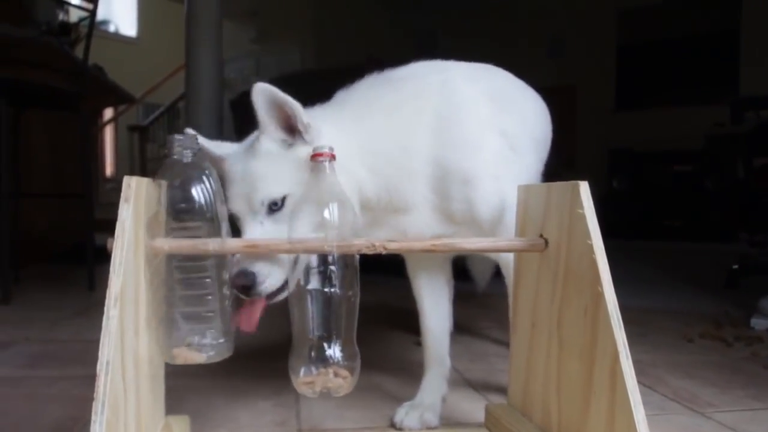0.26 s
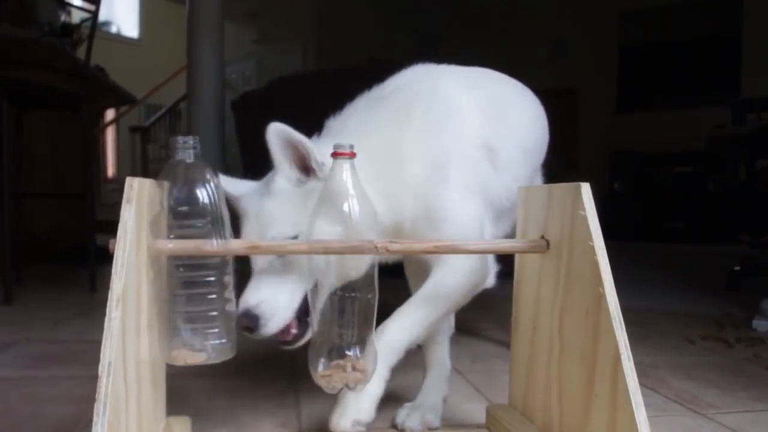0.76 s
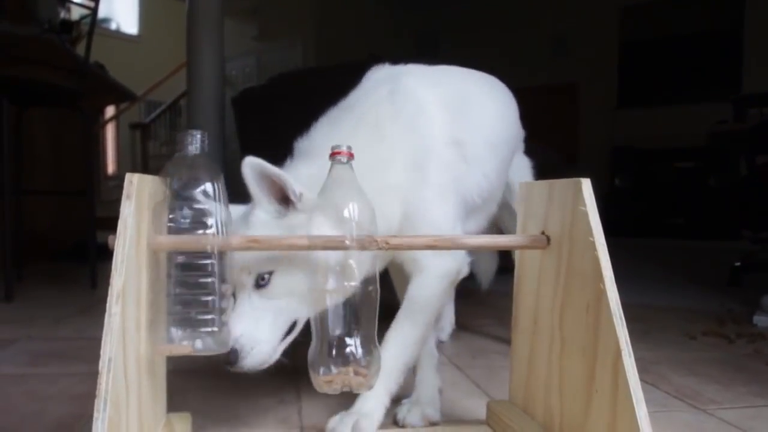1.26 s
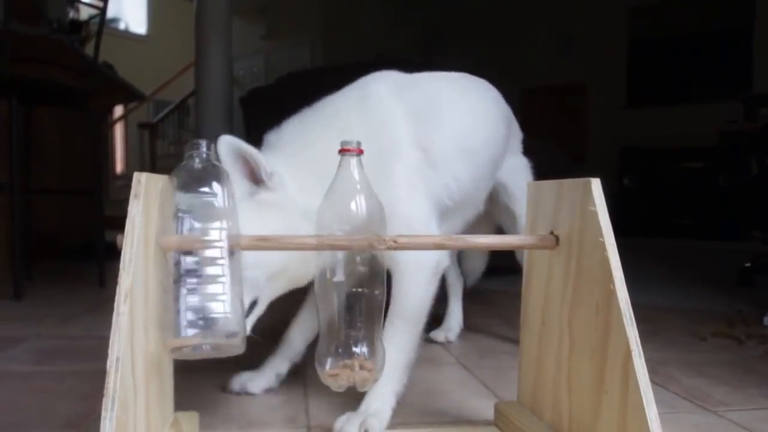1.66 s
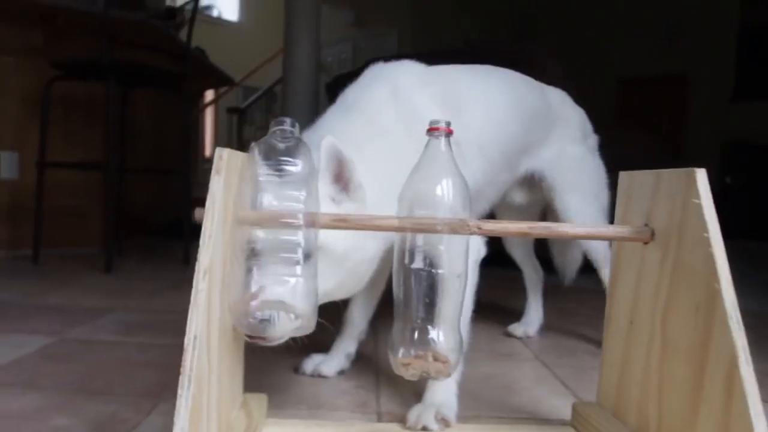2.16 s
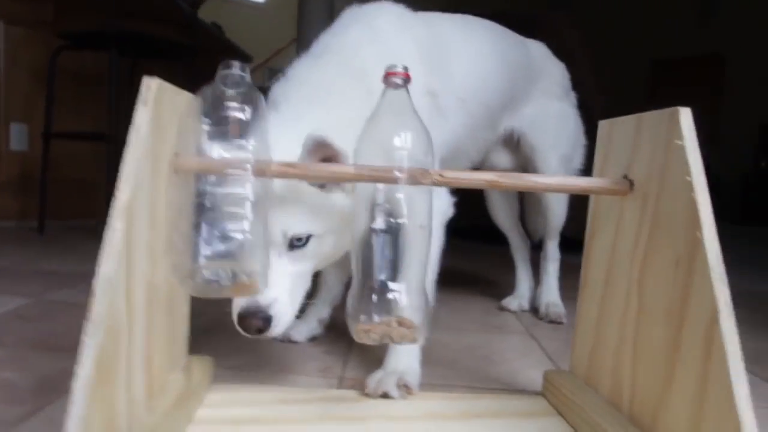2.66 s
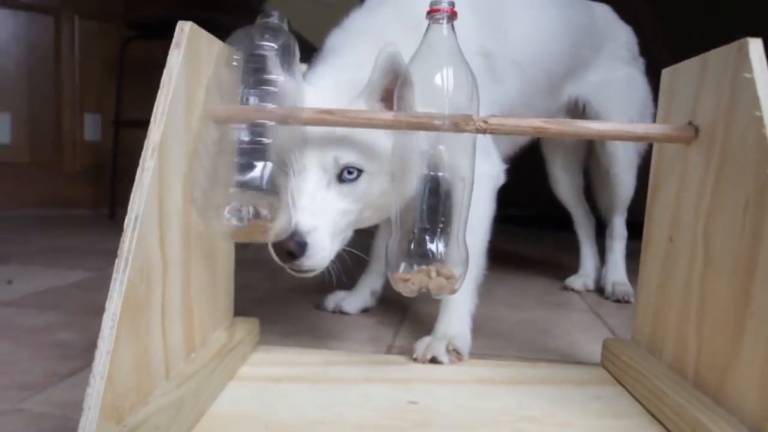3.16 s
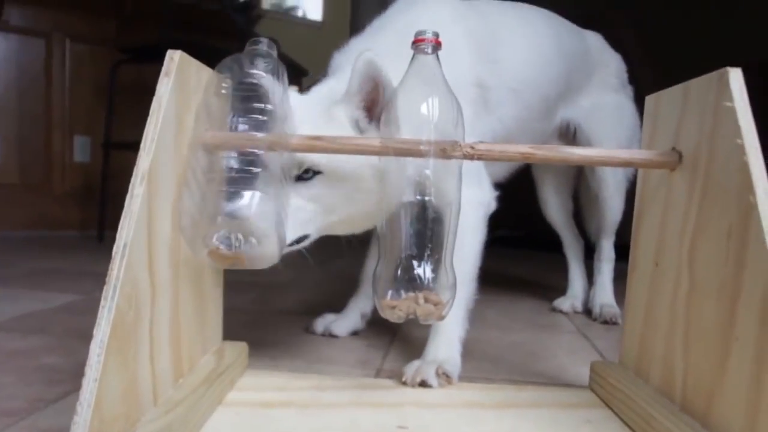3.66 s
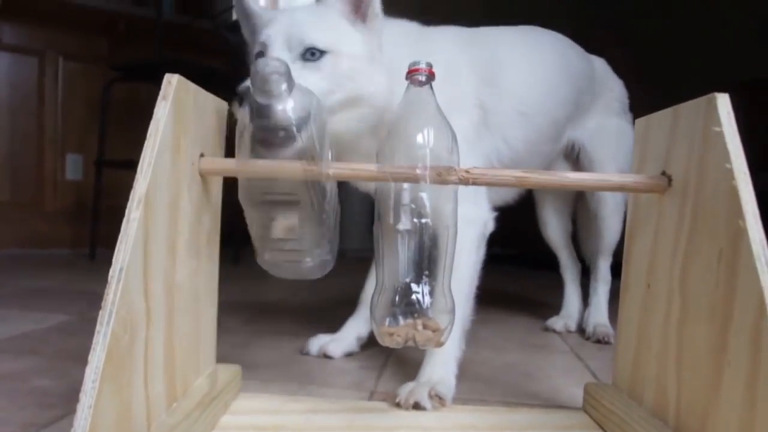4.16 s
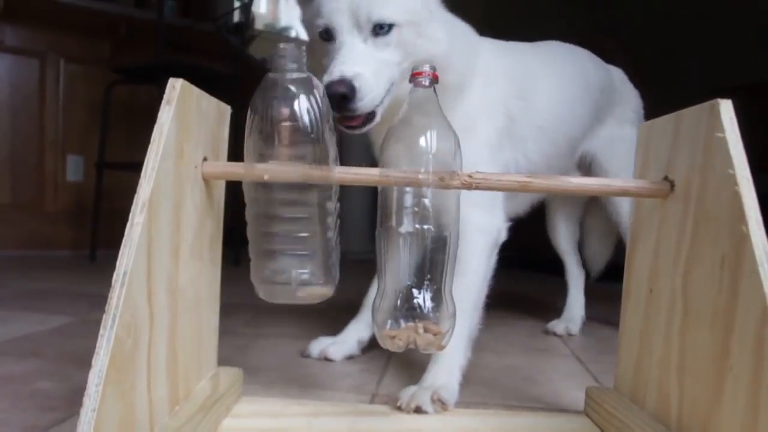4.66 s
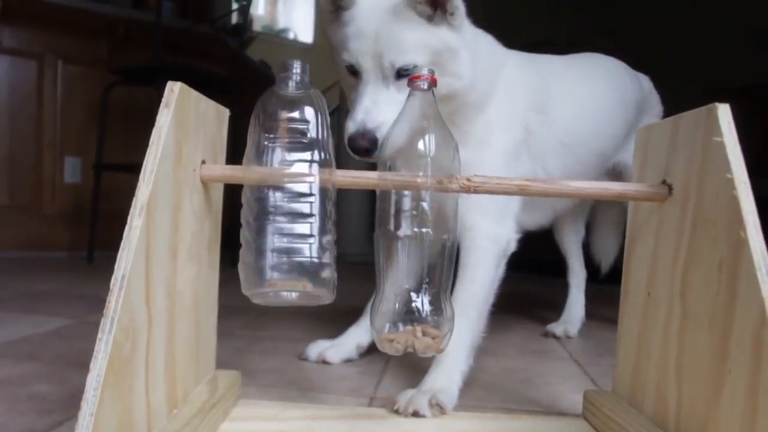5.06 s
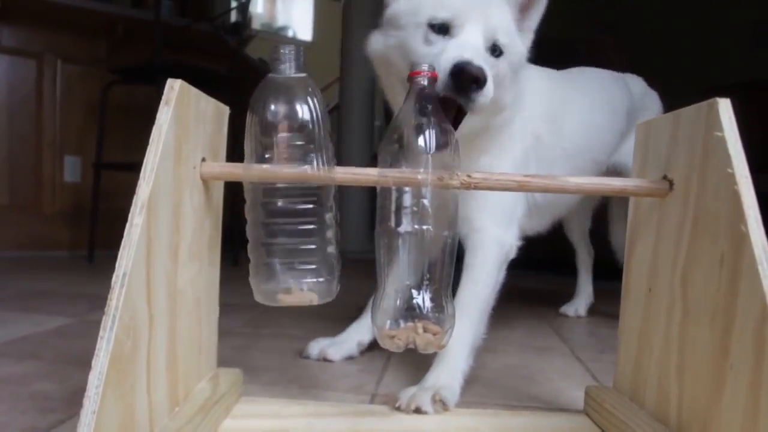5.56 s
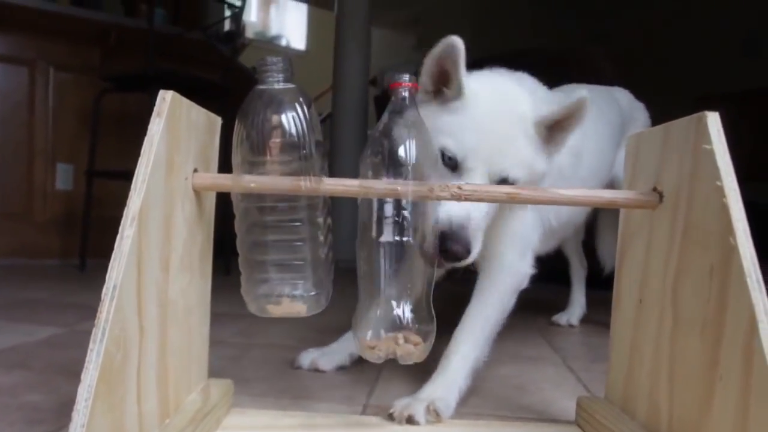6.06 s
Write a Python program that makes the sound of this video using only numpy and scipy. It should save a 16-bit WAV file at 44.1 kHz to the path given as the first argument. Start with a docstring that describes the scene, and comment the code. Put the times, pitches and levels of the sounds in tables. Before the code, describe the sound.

Light, hollow clacks and rattles start almost at once as a dog nudges plastic bottles holding dry treats. After a brief low hum, the bottles bang harder against their wooden rod, crackling and jolting the frame, and further bouts follow. Near the end the knocks fade and the dog's short sniffs take over. The room has a short, tiled echo, and the hand-held microphone rumbles faintly midway.

```python
"""Hollow plastic knocks, rattles and ticks in a tiled room, with snuffles between the bouts.
A dog noses two bottles hung on a wooden rod in a frame. Each knock on rod or frame rings the thin
wall, bounces the whole bottle and tosses the dry treats inside; the wall ticks as it buckles.
The dog's breath hisses through nose and muzzle, and its fur brushes the plastic.
Behind: one brief low hum, room tone and the faint rumble of a hand-held microphone."""
import sys
import numpy as np
from scipy import signal
from scipy.fft import rfft, irfft, next_fast_len
from scipy.io import wavfile

SR = 44100
rng = np.random.default_rng(int(sys.argv[2]) if len(sys.argv) > 2 else 0)


def dump(signal):
    """Clip the signal to [-1, 1] and save it as 16-bit WAV at the path in sys.argv[1]."""
    limited = np.clip(np.atleast_2d(signal).T, -1, 1)
    pcm = np.round(limited * 32767).astype(np.int16)
    wavfile.write(sys.argv[1], SR, pcm)


N = 278712
TIME_S = np.arange(N) / SR
BLOW_S = TIME_S[:5200]   # time axis of one blow
FIRM_KNOCK_DB = -15   # reference clack level for cracks and tosses
CRACK_T60_S = 0.034

# bottle knocks: (time [s], relative clack [dB], relative thump [dB], clack centre [Hz], thump pitch [Hz])
KNOCKS = [(0.358, -12.5, -23, 900, 297), (0.402, -21, -25, 700, 309), (0.422, -20, -35, 1060, 278),
          (0.624, -18.5, -22, 875, 350), (0.655, -20, -19.5, 1000, 296), (0.673, -18, -25, 970, 342),
          (0.713, -18.5, -24.5, 950, 222), (0.826, -28, -29.5, 770, 257), (0.891, -16.5, -15.5, 710, 255),
          (0.906, -15.5, -35, 980, 258), (0.958, -24.5, -41, 1400, 245), (1.172, -29.5, -37, 560, 245),
          (1.261, -45.5, -33, 920, 263), (1.331, -30.5, -33.5, 990, 246), (1.463, -16, -21.5, 960, 250),
          (1.531, -14.5, -16, 875, 281), (1.541, -13.5, -27, 950, 272), (1.558, -11, -14.5, 900, 295),
          (1.617, -19.5, -21.5, 886, 329), (1.645, -18, -29, 980, 262), (1.726, -13.5, -19.5, 1000, 260),
          (1.746, -16, -25.5, 1010, 268), (1.787, -16.5, -32, 940, 300), (1.857, -21, -34, 1000, 248),
          (2.17, -6.5, -17, 920, 281), (2.178, -3, -11.5, 960, 289.4), (2.194, -3, -16, 1300, 287),
          (2.212, -21, -12, 920, 262.5), (2.279, -5.5, -17, 1100, 258), (2.297, -9, -18.5, 1010, 256),
          (2.35, -21.5, -36, 1100, 249), (2.49, -22, -39, 946, 253), (2.526, -14.5, -22, 1060, 267.4),
          (2.543, -12.5, -22, 1400, 237), (2.615, -14, -29, 1470, 274), (2.664, -15, -31, 735, 279),
          (3.158, -15.5, -21.5, 760, 276), (3.171, -11.5, -18.5, 740, 269), (3.187, -14.5, -22.5, 900, 268),
          (3.198, -9.5, -19.5, 760, 240), (3.207, -9, -8, 610, 254), (3.237, -15.5, -24.5, 900, 256),
          (3.259, -9, -25, 800, 267), (3.287, -21.5, -18.5, 600, 273), (3.346, -23, -41, 900, 282),
          (3.358, -13.5, -25.5, 1530, 276), (3.392, -36, -30.5, 600, 229), (3.543, -32.5, -34, 860, 285),
          (3.659, -42, -30.5, 910, 214), (3.701, -27.5, -30, 590, 235), (3.971, -13.5, -30.5, 980, 264),
          (4.052, -20.5, -24.5, 760, 265), (4.086, -11, -32, 950, 212), (4.104, -14.5, -32, 1200, 235),
          (4.114, -14, -28, 1000, 228), (4.146, -15.5, -27.5, 760, 270), (4.175, -16.5, -18, 980, 229),
          (4.215, -14, -20.5, 610, 243), (4.36, -29.5, -29, 900, 248), (4.434, -16.5, -28.5, 980, 281),
          (4.497, -17.5, -32, 1070, 236), (4.597, -9, -28, 900, 281), (4.703, -25, -32.5, 780, 247),
          (4.832, -28.5, -33, 990, 228), (4.884, -20, -21, 1020, 290), (4.925, -27.5, -24, 920, 276),
          (4.968, -24.5, -31.5, 940, 290), (5.724, -43, -31, 900, 258), (5.785, -30.5, -26.5, 1300, 330),
          (5.84, -21.5, -20, 980, 272.4)]
# treats slide along a tipped bottle: (start [s], length [s], level [dB])
SLIDES = [(0.42, 0.068, -47.5), (0.61, 0.092, -43), (0.93, 0.066, -56.5), (1.34, 0.2, -58.5),
          (1.52, 0.34, -51), (4.02, 0.25, -45), (4.76, 0.085, -55.5), (5.7, 0.22, -55.5)]
# spectrum of a hard contact's first instant: (frequency [Hz], relative density [dB])
CRACK_SPECTRUM = [(300, -42.5), (1900, 12), (4300, 6.5), (5200, -1), (8000, -12), (11000, -20.5),
                  (16000, -28)]


def knocks(clack_gain_db=-10.0, thump_gain_db=-2.5, firm_crack_db=-51.5):
    """Each knock cracks at the contact, rings the wall and shakes the whole bottle."""
    out = np.zeros(N)
    for start_s, wall_db, body_db, centre_hz, thump_hz in KNOCKS:
        softness = np.clip((body_db - wall_db + 15.5) / 16, 0, 1.3)   # shoves: much thump, little clack
        contacts = chatter(softness)
        crack_db = firm_crack_db + 1.7 * (wall_db - FIRM_KNOCK_DB) + 1.5 * softness
        layers = [(wall_db + clack_gain_db, clack(centre_hz)), (crack_db, crack(CRACK_T60_S, snap=0.34))]
        for db, response in layers:
            add(out, start_s, from_db(db) * unit_attack(signal.fftconvolve(contacts, response)))
        add(out, start_s, from_db(body_db + thump_gain_db) * thump(thump_hz))
    return out


def chatter(softness, length_s=0.024, bounce_db=-10.0, count=5):
    """Contacts within one knock: a hard rap is single, a soft shove bounces on."""
    contacts = np.zeros(len(BLOW_S))
    contacts[0] = 1
    delays_s = length_s * rng.uniform(0.1087, 1, count)
    contacts[(delays_s * SR).astype(int)] = softness * from_db(bounce_db) * rng.standard_normal(count)
    return contacts


def clack(centre_hz, crowd_db=1.5):
    """The wall rings; harder contacts favour higher modes, and the light wall radiates little bass."""
    # wall and enclosed air: (frequency [Hz], relative level [dB], t60 [s])
    wall_modes = [(564.5, 2, 0.12), (623, -0.5, .06), (928.6, 6.5, 0.067), (1010, 4.5, 0.067),
                  (1132, 5, 0.039), (1400, 3, 0.05), (1515, 2, 0.063), (1640, 5, 0.056), (2071, 4, 0.032),
                  (3244, -7.5, 0.076), (4030, -7.5, 0.046), (5700, -13, 0.031)]
    # the wall's crowd of short-lived modes: (frequency [Hz], relative density [dB])
    crowd_spectrum = [(100, -55.5), (450, 0.5), (600, 3.5), (1000, 2), (1700, -1.5), (2200, -4.5),
                      (3000, -12.5), (4400, -33), (6500, -27.5)]
    wall = ring(wall_modes, scatter_db=3.5, detune=0.022, flip_chance=0.5)
    wall += from_db(crowd_db) * burst(crowd_spectrum, t60_s=0.064)
    # (frequency [Hz], gain [dB])
    contact = [(60, -26), (centre_hz / 3, -8.5), (centre_hz, 0),
               (centre_hz * 3, -8.5), (centre_hz * 10, -24)]
    return unit_attack(coloured(wall, contact))


def thump(pitch_hz):
    """The whole bottle bounces; its give rounds the onset, muzzle and rod soon still it."""
    # bottle on the rod: (ratio to pitch, relative level [dB], t60 [s])
    bottle_modes = [(0.801, -12, 0.056), (1, 1, .075), (1.33, -12, 0.088)]
    modes = [(pitch_hz * ratio, db, t60_s) for ratio, db, t60_s in bottle_modes]
    return unit_attack(band(ring(modes, scatter_db=3.0, detune=0.017), 165, 413, order=3))


def crack(t60_s, snap, top_hz=7000):
    """First instant of a contact, duller than a snap of the wall itself."""
    lowpass = signal.butter(1, top_hz, fs=SR)
    return unit_attack(signal.lfilter(*lowpass, burst(CRACK_SPECTRUM, t60_s, snap)))


def treats(gain_db=-3.5, thump_db=0.5, crack_db=-15.5, spots=10):
    """Dry treats land at random on spots of the wall, each with its own ring."""
    hits = agitation() * impulses(per_s=160)
    spot = rng.integers(0, spots, N)
    out = np.zeros(N)
    for k, (centre_hz, thump_hz) in enumerate(np.geomspace((600, 200), (2400, 350), spots)):
        response = clack(centre_hz) + from_db(crack_db) * crack(t60_s=0.046, snap=0.8)
        response += from_db(thump_db) * thump(thump_hz)
        out += signal.oaconvolve(hits * (spot == k), response / np.linalg.norm(response))[:N]
    return from_db(gain_db) * out


def agitation(lead_in_s=0.043, lead_in_db=-39.5, firm_toss_db=-34.5, tumble_db=20.5):
    """A faint rattle swells just before each knock; treats are tossed, settle, and tumble in slides."""
    power = (from_db(tumble_db) * swells(SLIDES)) ** 2
    lead_in = from_db(lead_in_db) * np.linspace(0, 1, int(lead_in_s * SR))
    settle = decay(TIME_S[:SR], t60_s=0.6)
    for knock_s, wall_db, *_ in KNOCKS:
        toss = from_db(firm_toss_db + 0.95 * (wall_db - FIRM_KNOCK_DB)) * settle
        add(power, knock_s - lead_in_s, np.concatenate([lead_in, toss]) ** 2)
    return np.sqrt(power)


def buckles(gain_db=-0.5):
    """The thin wall snaps in and out: the larger the dent, the lower and longer the snap."""
    # wall buckles: (time [s], relative level [dB], dent size [0-1])
    dents = [(0.358, -38, 0.9), (0.646, -38.5, 1), (0.675, -54, .1), (0.711, -46, 0.7),
             (1.329, -47.5, 0.67), (1.645, -43, 0.96), (1.683, -58, 0.55), (1.748, -49, .7),
             (2.178, -40, .7), (2.195, -32.5, 0.65), (2.2583, -53, .1), (2.279, -38, 0.7),
             (2.616, -49.5, 0), (2.691, -46, 0.68), (3.179, -46, 0.58), (3.199, -37, 0.74),
             (3.21, -35, 0.9), (3.263, -42, 0.8), (3.312, -46, .8), (3.3582, -37, 0.66), (4.103, -55, .4),
             (4.434, -59, 0.53), (4.497, -58, 0.3), (4.551, -50, 0.2), (4.599, -29, 0.67), (4.8064, -59, 0),
             (4.925, -49.5, 0.1), (5.115, -61.5, 0.6), (5.565, -67, 0), (5.5905, -67, 0), (5.607, -68, 0.1),
             (5.838, -48.5, 0.65)]
    # tick of a small dent: (frequency [Hz], relative density [dB])
    tick_spectrum = [(500, -42), (3000, -5), (6000, -6.5), (9000, -9.5), (16000, -18.5)]
    out = np.zeros(N)
    for start_s, db, size in dents:
        large = size ** 2 * burst(CRACK_SPECTRUM, CRACK_T60_S, snap=0.62)
        small = (1 - size) ** 2 * burst(tick_spectrum, t60_s=0.017, snap=0.47)
        add(out, start_s, from_db(db + gain_db) * unit_attack(large + small))
    return out


def frame():
    """The jolted wooden frame thuds on the tiles."""
    # frame jolts: (time [s], level [dB])
    jolts = [(2.18, -33.5), (2.281, -37), (3.203, -41), (3.297, -37), (4.175, -36.5)]
    # frame thud: (frequency [Hz], relative density [dB])
    thud_spectrum = [(30, -40), (85, -18), (130, 10), (175, 5.5), (400, -17), (3000, -88)]
    out = np.zeros(N)
    fade = np.linspace(1, 0, len(BLOW_S))
    for start_s, db in jolts:
        add(out, start_s, from_db(db) * burst(thud_spectrum, t60_s=0.072) * fade)
    return out


def slides():
    """Sliding treats hiss with many tiny catches."""
    # sliding hiss: (frequency [Hz], relative density [dB])
    hiss_spectrum = [(1000, 13.5), (2500, 8), (6500, -3.5), (9000, -13), (16000, -29)]
    return unit_rms(coloured(impulses(per_s=1300), hiss_spectrum)) * swells(SLIDES)


def snuffles(muzzle_hz=2350, muzzle_db=-9.0):
    """Puffs of air hiss through two resonances, the dog's nose and muzzle."""
    # breaths: (start [s], length [s], level [dB], nasal resonance [Hz])
    puffs = [(0.531, 0.086, -44, 1400), (1.932, 0.21, -59, 3440), (1.944, 0.2, -56, 2440),
             (5.481, 0.14, -47, 1210), (5.694, 0.07, -45.5, 1150), (5.948, 0.08, -47, 1250),
             (6.081, 0.083, -57, 1423), (6.173, 0.08, -48.5, 1390)]
    out = np.zeros(N)
    for start_s, length_s, db, nose_hz in puffs:
        envelope = swell(length_s)
        air = rng.standard_normal(len(envelope))
        nose, muzzle = (unit_rms(band(air, hz / 1.22, hz * 1.22, order=3)) for hz in (nose_hz, muzzle_hz))
        add(out, start_s, from_db(db) * envelope * (nose + from_db(muzzle_db) * muzzle))
    return out


def fur():
    """Fur on plastic makes a faint, high rustle."""
    # fur strokes: (start [s], length [s], level [dB])
    strokes = [(1.1, 0.23, -74), (3.63, 0.12, -73), (5.39, 0.16, -73)]
    return unit_rms(band(impulses(per_s=1500), 5370, 15200)) * swells(strokes)


def hum(start_s=1.937, length_s=0.1, pitch_hz=161, level_db=-36):
    """A soft low tone swells briefly and fades."""
    out = np.zeros(N)
    envelope = swell(length_s)
    tone = np.sqrt(2) * np.sin(2 * np.pi * pitch_hz * TIME_S[:len(envelope)])
    add(out, start_s, from_db(level_db) * envelope * tone)
    return out


def reverb(x, wet_db=-12.0, onset_s=0.0034, build_s=0.0067):
    """Diffuse reflections from tiles and walls, dying band by band."""
    # reflected share: (frequency [Hz], relative level [dB])
    colour = [(200, 9.5), (2000, -6), (5000, -1), (12000, -6)]
    # room decay: (frequency [Hz], t60 [s])
    decay_times = [(120, 0.18), (320, 0.32), (900, 0.49), (2200, 0.38), (6000, 0.37), (14000, 0.46)]
    t = TIME_S[:SR * 3 // 4]
    edges_hz = np.geomspace(80, 16000, 9)
    tail = np.zeros(len(t))
    for low_hz, high_hz in zip(edges_hz, edges_hz[1:]):
        mid_hz = np.sqrt(low_hz * high_hz)
        noise = band(rng.standard_normal(len(t)), low_hz, high_hz)
        tail += from_db(at_hz(colour, mid_hz)) * noise * decay(t, at_hz(decay_times, mid_hz))
    tail *= np.clip((t - onset_s) / build_s, 0, 1)
    return from_db(wet_db) * signal.oaconvolve(x, tail / np.linalg.norm(tail))[:N]


def handling(gain_db=4):
    """The hand bumps the microphone: dull swells of rumble."""
    # handling bumps: (start [s], length [s], relative level [dB])
    bumps = [(2.16, 0.28, -47.5), (2.532, 0.16, -49), (2.715, 0.15, -53.5), (2.845, 0.059, -48.5),
             (3.02, 0.056, -55), (3.118, 0.054, -42), (3.377, 0.054, -48)]
    # handling rumble: (frequency [Hz], relative density [dB])
    rumble_spectrum = [(20, -47), (45, 14.5), (70, -5), (110, 8.5), (180, 4), (400, -66)]
    rumble = unit_rms(coloured(rng.standard_normal(N), rumble_spectrum))
    return from_db(gain_db) * swells(bumps, skew=0.51) * rumble


def room_tone(level_db=-53.5):
    """Steady, mostly low background noise."""
    # room background: (frequency [Hz], relative density [dB])
    tone_spectrum = [(25, -39), (55, -15), (105, -5.5), (150, -12), (230, -8.5), (450, -20), (1300, -21),
                     (2800, -28.5), (4800, -41.5), (16000, -54.5)]
    return from_db(level_db) * unit_rms(coloured(rng.standard_normal(N), tone_spectrum))


def ring(modes, scatter_db, detune, flip_chance=0):
    """One blow on the modes; strength, sign, pitch and damping vary with the spot hit, drawn at random."""
    hz, db, t60_s = np.transpose(modes)
    gain = from_db(db + scatter_db * rng.standard_normal(len(hz)))
    gain *= np.where(rng.random(len(hz)) < flip_chance, -1, 1)
    hz = hz * (1 + detune * rng.standard_normal(len(hz)))
    t60_s = t60_s * from_db(rng.normal(0, 1.0))
    waves = np.sin(2 * np.pi * hz[:, None] * BLOW_S)
    return unit_attack(gain @ (waves * decay(BLOW_S, t60_s[:, None])))


def burst(spectrum, t60_s, snap=0.0):
    """Countless close modes die together; snap adds one clean impulse at the start."""
    crowd = rng.standard_normal(len(BLOW_S)) * decay(BLOW_S, t60_s)
    crowd[0] += snap * np.linalg.norm(crowd)
    return unit_attack(coloured(crowd, spectrum))


def impulses(per_s, spread_db=3.0):
    """Random impulses of uneven size, rms 1."""
    sizes = from_db(spread_db * np.minimum(rng.exponential(1, N), 3))
    signs = rng.choice([-1, 1], N)
    return unit_rms(sizes * signs * (rng.random(N) < per_s / SR))


def swell(length_s):
    """Quick rise, slower fall."""
    return np.sin(np.pi * np.linspace(0, 1, int(length_s * SR), endpoint=False) ** 0.54)


def swells(rows, skew=0.95):
    """Gain over time, one arch a row; skew under 1 peaks earlier."""
    return sum(from_db(db) * np.sin(np.pi * np.clip((TIME_S - start_s) / length_s, 0, 1) ** skew)
               for start_s, length_s, db in rows)


def decay(t, t60_s):
    """Exponential fall, 60 dB in t60_s."""
    return np.exp(-np.log(1000) * t / t60_s)


def coloured(x, spectrum):
    """Minimum-phase filter with the given spectrum."""
    size = 2 * next_fast_len(len(x) // 2 + 1024)
    gain = from_db(at_hz(spectrum, np.fft.rfftfreq(size, 1 / SR)))
    cepstrum = irfft(np.log(gain))
    cepstrum[1:size // 2] *= 2
    cepstrum[size // 2 + 1:] = 0
    return irfft(rfft(x, size) * np.exp(rfft(cepstrum)))[:len(x)]


def band(x, low_hz, high_hz, order=2):
    """Band-pass filter."""
    return signal.sosfilt(signal.butter(order, [low_hz, high_hz], "band", fs=SR, output="sos"), x)


def at_hz(points, hz):
    """Read a table on a log-frequency axis."""
    table_hz, values = np.transpose(points)
    return np.interp(np.log(np.maximum(hz, 1)), np.log(table_hz), values)


def from_db(db):
    """Decibels to gain."""
    return 10 ** (np.asarray(db) / 20)


def unit_rms(x):
    """Scale to rms 1."""
    return x / np.sqrt(np.mean(x ** 2) + 1e-20)


def unit_attack(x):
    """Scale to rms 1 over the first 12 ms."""
    return x / np.sqrt(np.mean(x[:512] ** 2) + 1e-20)


def add(out, start_s, sound):
    """Mix a sound in at start_s."""
    start = max(round(start_s * SR), 0)
    out[start:start + len(sound)] += sound[:N - start]


def scene():
    """Bottles and dog in the room, over room tone, handling rumble and a brief hum; mono."""
    direct = knocks() + frame() + buckles() + treats() + slides() + fur() + snuffles()
    background = room_tone() + handling() + hum()
    return (direct + reverb(direct) + background)[None]


def record(dry, low_hz=38, high_hz=15750):
    """Round the highest peaks, shed the deepest bass, cut the top."""
    rounded = 1.284 * np.tanh(dry / 1.313)
    lean = signal.sosfilt(signal.butter(2, low_hz, "high", fs=SR, output="sos"), rounded)
    return signal.sosfilt(signal.ellip(10, 0.1, 80, high_hz, fs=SR, output="sos"), lean)


dry = scene()
out = record(dry)
dump(out)
```